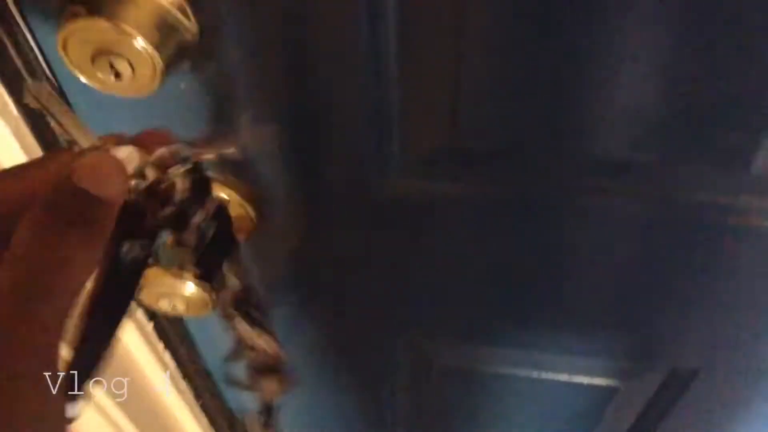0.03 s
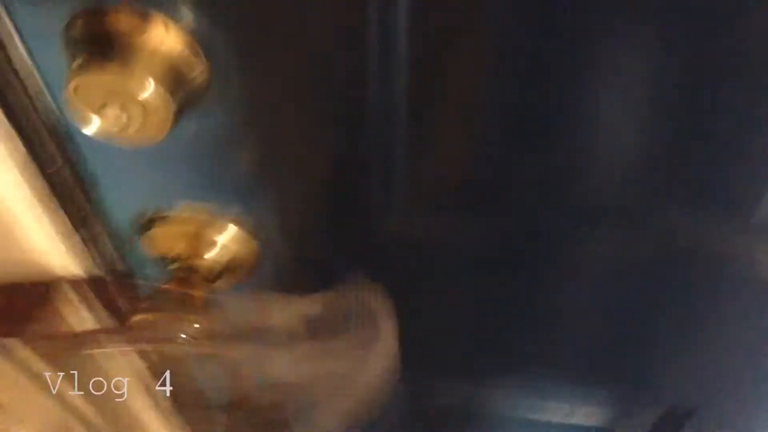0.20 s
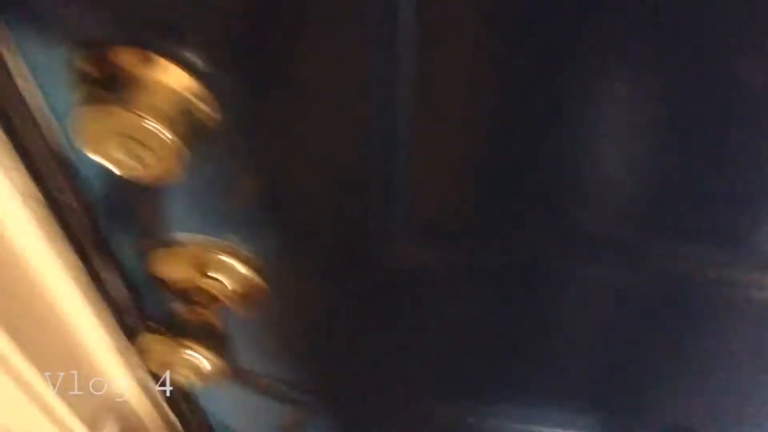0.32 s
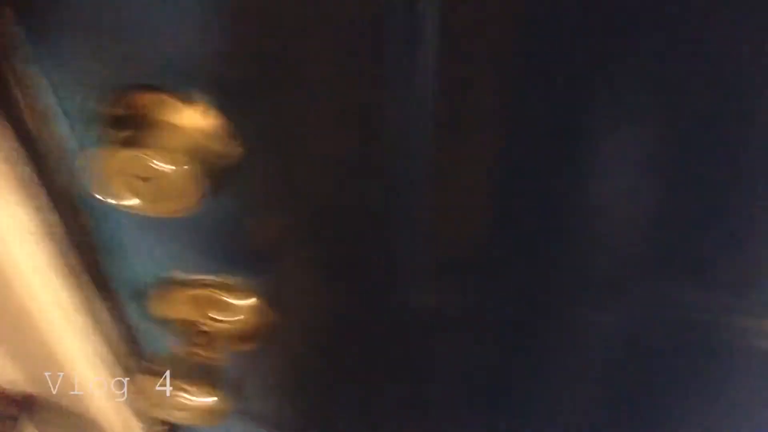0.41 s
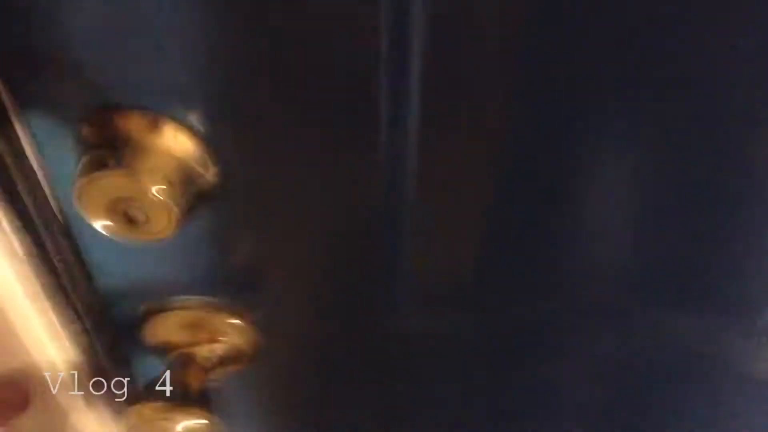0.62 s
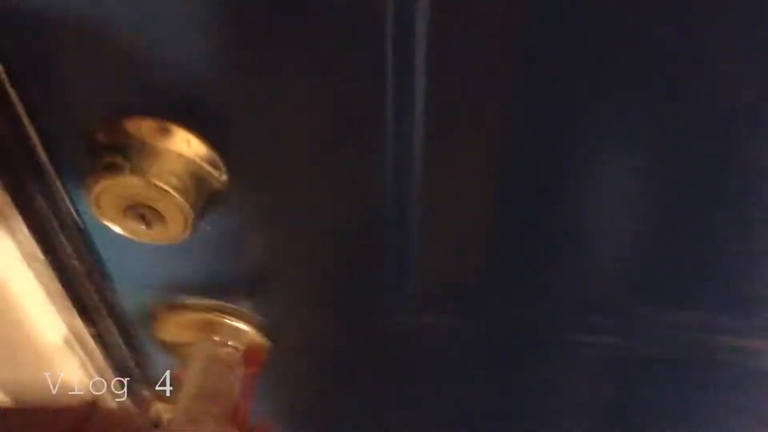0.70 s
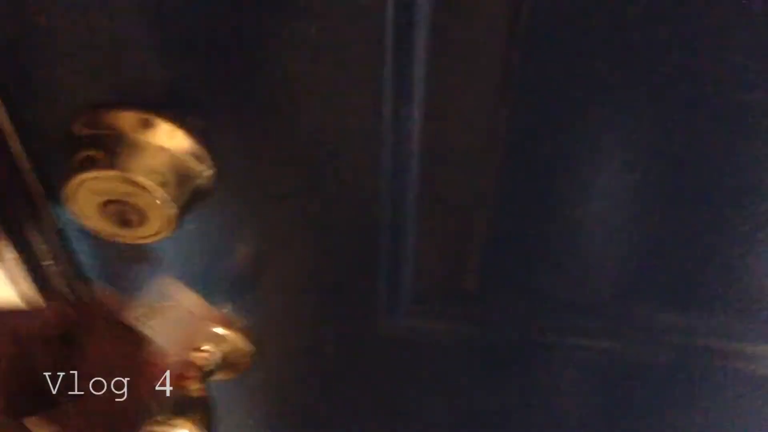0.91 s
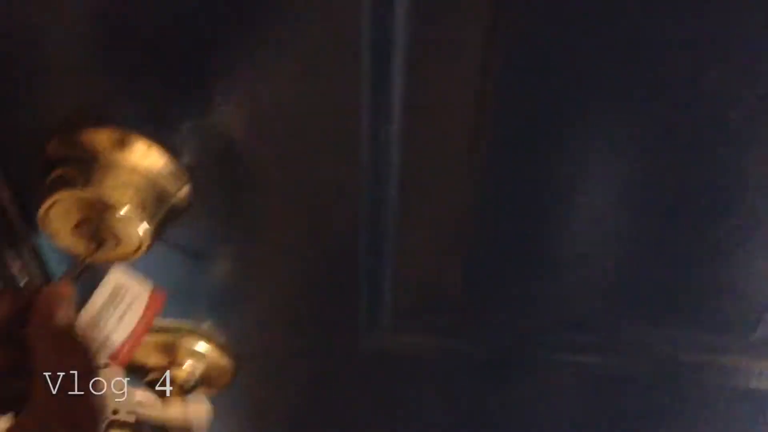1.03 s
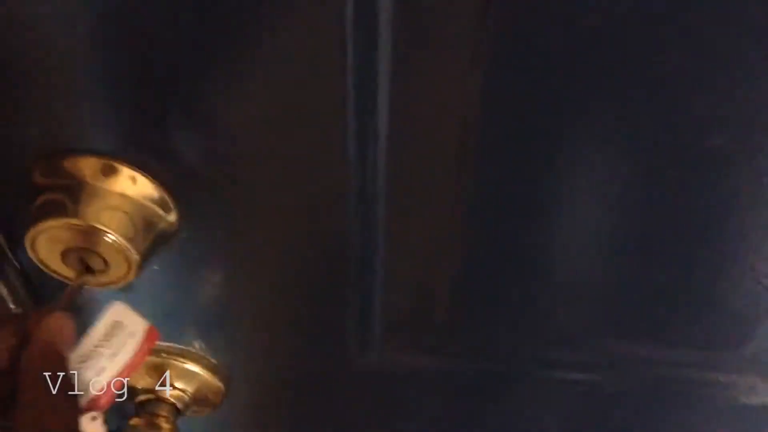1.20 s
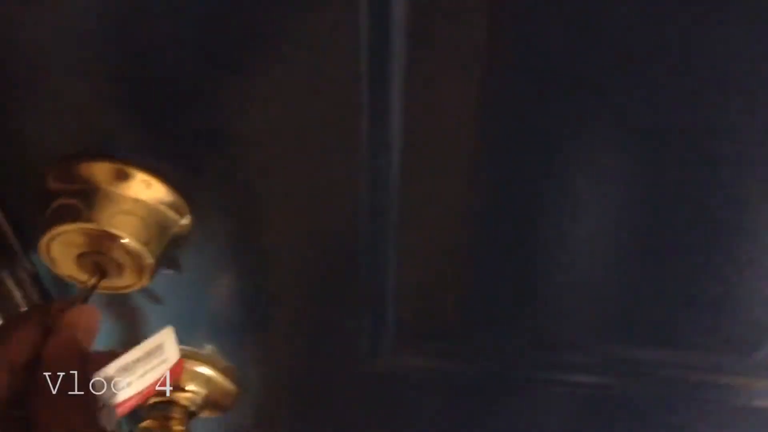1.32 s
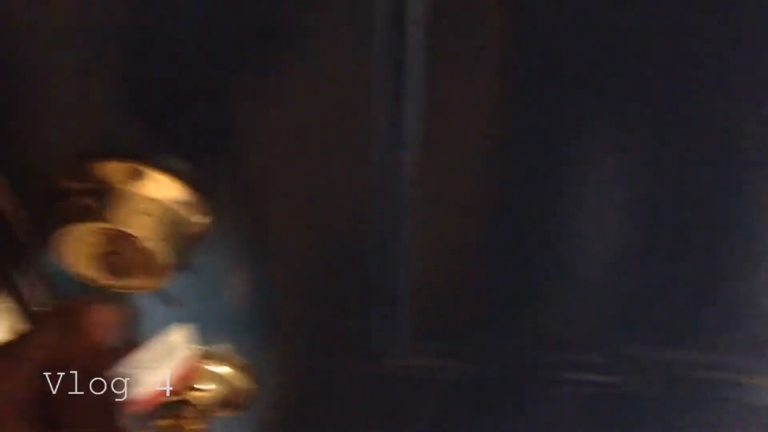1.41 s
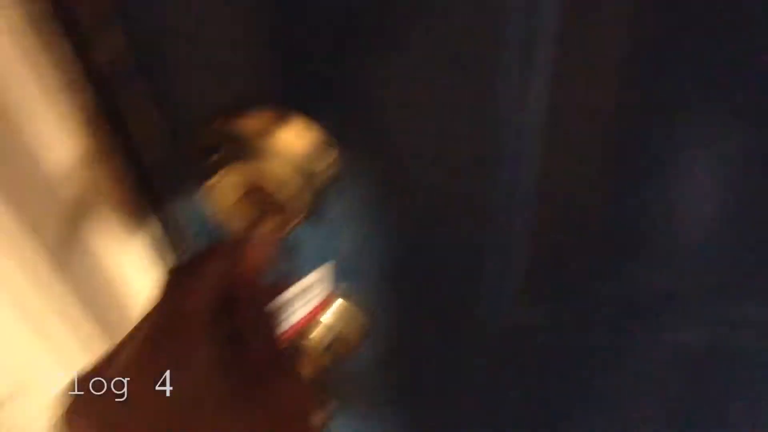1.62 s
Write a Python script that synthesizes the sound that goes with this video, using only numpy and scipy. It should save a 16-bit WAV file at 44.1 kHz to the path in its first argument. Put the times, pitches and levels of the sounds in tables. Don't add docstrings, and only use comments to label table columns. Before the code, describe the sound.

Keys rattle in a hand and strike a brass knob and deadbolt, busiest in the first half second, then scattered clacks and faint ticks; close mono sound, slight indoor echo, quiet low hum.

```python
import sys
import numpy as np
from scipy import signal
from scipy.fft import rfft, irfft
from scipy.io import wavfile
from scipy.ndimage import uniform_filter1d

SR = 44100
rng = np.random.default_rng(int(sys.argv[2]) if len(sys.argv) > 2 else 0)


def invert_db(x):
    u = np.asarray(x, float) / 20
    return 10 ** u


def dump_mix(stems):
    frames = np.atleast_2d(stems).T
    limited = np.clip(frames, -1, 1)
    pcm = np.round(limited * 32767).astype(np.int16)
    wavfile.write(sys.argv[1], SR, pcm)


N = 72765

# t/s, peak level/dB, loudest pitch f/Hz, chatter t60/s
CLINKS = [(.105, -36.5, 4800, 0.11), (.122, -32.5, 8500, 0.018), (.2045, -20.5, 9200, 0.019),
          (.2117, -12.5, 5940, 0.0092), (.226, -25, 11480, 0.013), (.255, -21, 12000, 0.029),
          (.2664, -15.5, 3830, 0.018), (.2737, -14, 8060, 0.024), (.279, -14.5, 8050, 0.019),
          (.311, -21.5, 11500, 0.049), (.328, -15, 11600, 0.017), (.333, -13, 11900, 0.026),
          (.338, -10.5, 14040, 0.046), (.3635, -15, 6660, 0.069), (.372, -17.5, 11530, 0.0093),
          (.3792, -8, 10550, 0.0056), (.382, -13, 9500, 0.017), (.396, -8.5, 9240, 0.011),
          (.408, -19.5, 12540, 0.012), (.4255, -16, 8500, 0.011), (.446, -18, 6580, 0.0092),
          (.4605, -20, 10800, 0.0041), (.4688, -6, 9300, 0.017), (.479, -20, 9350, 0.028),
          (.511, -26.5, 5620, .03), (.540, -33, 5900, 0.014), (.548, -23, 4540, 0.037),
          (.5606, -21.5, 9400, 0.018), (.5683, -21.5, 5700, 0.011),
          (0.598, -24, 6300, 0.029), (.6164, -42, 9060, 0.011), (.648, -31, 6740, 0.029),
               (.668, -32, 9500, 0.0094), (.684, -22.5, 5200, 0.012), (0.6937, -11.5, 9500, 0.012),
               (.7003, -23, 11800, 0.016), (0.7259, -22.5, 7200, 0.034), (0.7345, -23.5, 7700, 0.025),
               (0.75, -28, 13800, 0.037), (.785, -26, 8550, 0.027), (0.7936, -17.5, 8100, 0.008),
               (.796, -16.5, 9700, 0.019), (0.834, -29, 4500, 0.021), (.852, -24, 9250, 0.026),
               (0.9186, -30, 9300, 0.054), (.947, -32, 4040, 0.003), (1.004, -37, 8950, 0.016),
               (1.0272, -24, 6860, 0.018), (1.0348, -30, 4920, 0.0094), (1.042, -18, 9530, 0.03),
               (1.1094, -26.5, 9600, 0.0047), (1.1143, -35.5, 9620, 0.019), (1.2422, -14, 8960, 0.03),
               (1.249, -15.5, 7620, 0.016), (1.334, -37, 5840, 0.03), (1.3828, -46.5, 6500, .02)]
# t/s, peak level/dB, loudest pitch f/Hz, chatter t60/s
FAINT_CLINKS = [
    (.967, -36.5, 2800, 0.072),
    (1.166, -51, 9000, .015),
    (1.419, -49, 4500, .02),
    (1.531, -55.5, 6030, 0.0097),
    (1.538, -60, 7950, 0.0097),
    (1.557, -54.5, 4470, .01),
    (1.62, -58, 9000, 0.077),
]
# t/s, peak level/dB, loudest pitch f/Hz, chatter t60/s
KNOCKS = [(0, -44.5, 2600, 0.29), (.120, -37.5, 1110, 0.058), (.178, -33.5, 2450, 0.41),
          (.2115, -18.5, 1730, 0.078), (.218, -18, 2190, 0.22), (.235, -26, 496, 0.28),
          (.278, -19.5, 2130, 0.11), (.333, -22.5, 1110, 0.068), (.3792, -16, 2020, 0.037),
          (.468, -34.5, 990, 0.023), (.599, -28.5, 880, 0.045), (.684, -30, 1690, 0.014),
          (.694, -26.5, 1840, 0.064), (.726, -51, 2920, 0.013), (.792, -38, 1070, 0.01),
          (.794, -26.5, 2260, 0.018), (1.0435, -26, 1700, 0.044), (1.0445, -25.5, 1144, 0.014),
          (1.046, -28, 2550, 0.082), (1.2425, -16.5, 2250, 0.0093), (1.2435, -23.5, 1025, 0.08),
          (1.248, -16.5, 3840, 0.027), (1.419, -31, 2400, 0.027), (1.531, -48, 4230, 0.028)]
# t/s, f/Hz, peak level/dB, t60/s
PINGS = [(0.206, 8750, -38, 0.035), (.2118, 4510, 0, 0.0022), (0.2116, 1540, -28.5, 0.07),
         (0.2112, 3180, -15, 0.009), (.2117, 4770, -21.5, 0.038), (0.2098, 6110, -21, 0.024),
         (0.2177, 3300, -14, 0.0098), (0.2737, 1790, -20, 0.013), (0.274, 4430, -24, .015),
         (0.278, 8150, -27, 0.01), (.279, 3590, -22, 0.022), (.280, 2240, -27.5, 0.034),
         (.3342, 6990, -8, 0.0015), (0.3332, 3050, -20, 0.015), (.334, 8000, -26, 0.076),
         (0.379, 4960, -7, 0.0011), (.3792, 6440, -16, 0.009), (0.379, 2600, -12, 0.0064),
         (0.3786, 8500, -16, .01), (0.425, 4780, -24, 0.02), (.446, 6370, -22.5, 0.029),
         (.466, 60, -32.5, 0.048), (.4688, 9560, -4, .016), (.470, 6040, -18.5, 0.036),
         (.470, 4270, -20.5, 0.014), (.472, 13850, -27.5, 0.058), (.478, 14980, -34.5, 0.043),
         (.7925, 1000, -31, 0.025), (.968, 4996, -36, 0.13), (0.481, 11550, -25.5, 0.069),
         (1.043, 8640, -19, 0.0073), (1.044, 1089, -21, 0.024), (1.045, 1649, -18.5, 0.029),
         (1.0452, 3284, -24.5, 0.038), (1.0444, 3052, -24.5, 0.032), (1.046, 2190, -24, 0.019),
         (1.048, 1597, -37.5, 0.17), (1.045, 7960, -36, .04), (1.047, 171.6, -40, 0.079),
         (1.242, 1020, -28, 0.054), (1.2434, 2215, -16.5, 0.009), (1.2418, 3400, -17.5, 0.01),
         (1.2442, 8370, -22, 0.023), (1.247, 7050, -27, 0.023), (1.248, 1910, -26.5, 0.024),
         (1.2511, 3020, -21, 0.011), (1.419, 1510, -43.5, 0.029), (1.419, 4730, -40.5, 0.016),
         (1.419, 6200, -45, 0.014), (1.421, 90, -44, 0.044)]
# t/s, f/Hz,
# level/dB, free time/s
RINGS = [(0.085, 10640, -55, 0.11), (.113, 11600, -54, 0.032), (0.228, 13900, -34.5, 0.017),
         (0.28, 11480, -32, 0.1), (0.334, 11560, -18.5, 0.017), (.366, 11500, -26, 0.013),
         (0.381, 11560, -20, 0.033), (.352, 13900, -34, .045), (0.469, 11550, -19, 0.025),
         (.470, 9087, -25, 0.044), (0.968, 3764, -53, .07), (.470, 9205, -32.5, 0.035),
         (.694, 11500, -23, 0.014), (.694, 13750, -25, 0.01), (.767, 11580, -35.5, 0.044),
         (.803, 11610, -27.5, 0.018), (0.855, 11560, -39.5, 0.024), (1.05, 1129, -38.5, 0.084),
         (.967, 6374, -46.5, 0.1), (0.968, 11570, -47, 0.029), (.967, 13860, -44.5, 0.039),
         (0.967, 1650, -48, 0.027), (1.052, 15000, -58, .008), (1.109, 6374, -50.5, 0.022)]
# f/Hz, level/dB
KEY_COLOUR = [(450, -45.5), (1560, -12.5), (4000, -5.5), (9400, -5.5), (15000, -10), (15900, -50.5)]
# f/Hz, level/dB
LOCK_COLOUR = [(100, -36.5), (480, -23), (800, 11.5), (1020, 9), (3200, 14), (9800, -24), (15000, -41.5),
               (16000, -66.5)]
# t/s, rattle level/dB
SHAKE = [(0, -49), (.06, -64), (.17, -53.5), (.21, -41), (.3, -37.5), (.4, -30), (.46, -45.5), (.53, -52),
         (.61, -39.5), (.63, -65), (.68, -45), (.76, -49), (.82, -53), (.89, -62), (1.03, -53.5),
         (1.2, -77.5), (1.3, -51), (1.5, -89.5)]
# f/Hz, level per Hz/dB
HUM_COLOUR = [(30, -9), (100, -7.5), (170, 0), (320, -3.5), (420, -18.5), (1000, -14), (2500, -28.5),
              (16000, -54)]
# t/s, level/dB
HUM_LEVEL = [
    (0, -50),
    (.17, -50),
    (.25, -43.5),
    (.46, -55.5),
    (.5, -70),
    (.9, -57.5),
    (1.06, -54),
    (1.3, -54),
    (1.62, -52),
]
# f/Hz, t60/s
HALL_DECAY = [(500, 0.52), (3000, 0.37), (15000, 0.1)]


def strikes(rows, spectrum, pitch_db, modes_db, width_hz, low_hz, high_hz):
    out, t = np.zeros(N), np.arange(6000) / SR
    rise_s, tick_db = 0.00098, -11
    mode_t60 = 2.2 / width_hz
    chatters = rng.standard_normal((len(rows), len(t)))
    spots = rng.random((len(rows), 5))
    for (s, db, hz, t60), chatter, spot in zip(rows, chatters, spots):
        drive = evened(chatter * invert_db(-60 * t / max(t60, 0.003)) * np.minimum(t / rise_s, 1))
        drive = drive + (t == 0) * invert_db(tick_db) * np.sqrt(len(t))
        modes = sum(evened(ring(drive, low_hz * (high_hz / low_hz) ** u, mode_t60)) for u in spot)
        sound = evened(colour(drive, spectrum))
        sound = sound + invert_db(pitch_db) * evened(ring(drive, hz, mode_t60))
        sound = sound + invert_db(modes_db) * evened(modes)
        peak = np.sqrt(uniform_filter1d(sound ** 2, 88).max())
        add(out, s, invert_db(db - 10.5) * sound / peak)
    return out


def key_clinks(rows):
    return strikes(rows, KEY_COLOUR, pitch_db=-1, modes_db=-15, width_hz=1200, low_hz=4502.5, high_hz=13999)


def lock_knocks():
    return strikes(KNOCKS, LOCK_COLOUR, pitch_db=0.5, modes_db=-18, width_hz=210.5, low_hz=901, high_hz=3501.5)


def pings():
    out, t = np.zeros(N), np.arange(6000) / SR
    rise_s = 0.00037
    for s, hz, db, t60 in PINGS:
        swell = 1 - np.exp(-t / rise_s)
        level = db - 60 * t / max(t60, 0.002)
        add(out, s, invert_db(level) * np.sin(2 * np.pi * hz * t) * swell)
    return out


def free_rings():
    out, t = np.zeros(N), np.arange(6000) / SR
    fall_db, damp_t60_s, wobble_db, rise_s = -28, 0.02, 4, 0.00077
    wobbles = uniform_filter1d(rng.standard_normal((len(RINGS), len(t))), 130, 1)
    for (s, hz, db, free), wobble in zip(RINGS, wobbles):
        level = db + fall_db * t / free + wobble_db * evened(wobble)
        level = level - 60 * np.maximum(t - free, 0) / damp_t60_s
        add(out, s, invert_db(level) * np.sin(2 * np.pi * hz * t) * np.minimum(t / rise_s, 1))
    return out


def rattle():
    touches_per_s, spread_db, t60_s, rattle_db = 900, 4.5, 0.02, -1
    strength = invert_db(spread_db * np.minimum(rng.exponential(1, N), 4))
    touches = strength * (rng.random(N) < touches_per_s / SR)
    which, t = rng.integers(0, 12, N), np.arange(1500) / SR
    grains = rng.standard_normal((12, len(t))) * invert_db(-60 * t / t60_s)
    dense = sum(signal.oaconvolve(touches * (which == k), grain)[:N] for k, grain in enumerate(grains))
    return invert_db(rattle_db + curve(SHAKE)) * evened(colour(dense, KEY_COLOUR))


def hall(x):
    taps = np.zeros(SR // 2)
    at = np.arange(100, len(taps) - 20, 20)
    taps[at + rng.integers(0, 20, len(at))] = rng.choice([-1., 1.], len(at))
    hz, t, z = signal.stft(taps, SR, nperseg=256)
    fade = invert_db(-60 * t / read(HALL_DECAY, hz)[:, None])
    tail = signal.istft(z * fade, SR, nperseg=256)[1]
    return signal.fftconvolve(x, tail / np.linalg.norm(tail))[:N]


def hum():
    hz = np.fft.rfftfreq(N, 1 / SR)
    noise = rfft(rng.standard_normal(N))
    return invert_db(curve(HUM_LEVEL)) * evened(irfft(noise * invert_db(read(HUM_COLOUR, hz)), N))


def evened(x):
    return x / np.sqrt(np.mean(x ** 2) + 1e-20)


def read(points, hz):
    f, value = np.transpose(points)
    return np.interp(np.log(hz + 1), np.log(f + 1), value)


def curve(points):
    s, value = np.transpose(points)
    return np.interp(np.arange(N) / SR, s, value)


def add(mix, s, sound):
    part = mix[round(s * SR):][:len(sound)]
    part += sound[:len(part)]


def colour(x, points):
    log_gain = np.log(invert_db(read(points, abs(np.fft.fftfreq(2048, 1 / SR)))))
    taps = np.fft.ifft(np.exp(np.conj(signal.hilbert(log_gain)))).real[:1024]
    return signal.oaconvolve(x, taps)[:len(x)]


def ring(x, hz, t60):
    pole = np.exp((2j * np.pi * hz - np.log(1000) / max(t60, 0.002)) / SR)
    return signal.lfilter([1], [1, -pole], x).imag


def scene():
    near = key_clinks(CLINKS) + lock_knocks() + free_rings()
    clean = pings()
    far = invert_db(-11) * hall(near + invert_db(-5) * clean)
    mix = near + clean + far + rattle() + hum() + key_clinks(FAINT_CLINKS)
    return mix[None]


def band_limit(x):
    return signal.sosfilt(signal.butter(12, 16330, fs=SR, output="sos"), x)


def record(dry):
    low_cut = signal.butter(3, 119, "high", fs=SR, output="sos")
    edge = signal.firwin(101, 15900, fs=SR)
    mix = signal.oaconvolve(signal.sosfilt(low_cut, dry), edge[None], "same")
    return band_limit(mix)


dry = scene()
out = record(dry)
dump_mix(out)
```